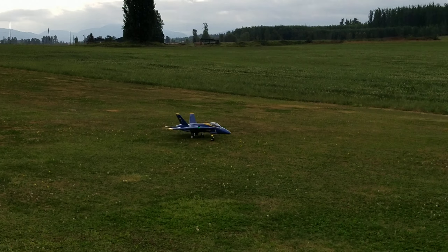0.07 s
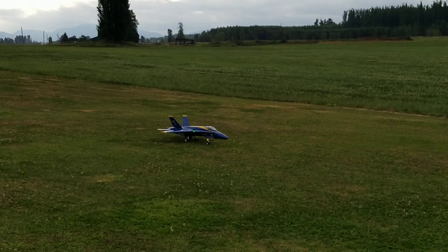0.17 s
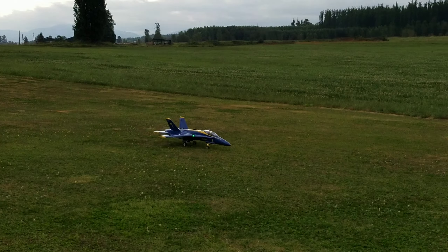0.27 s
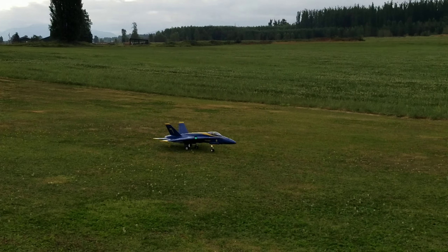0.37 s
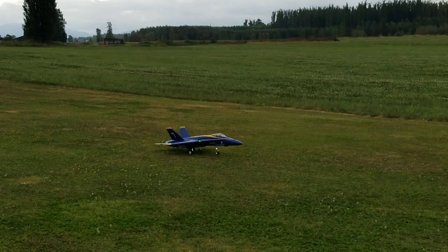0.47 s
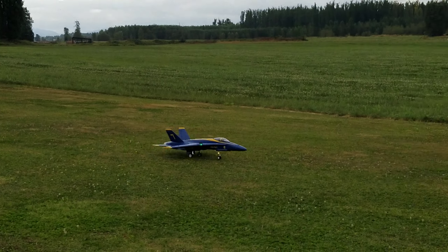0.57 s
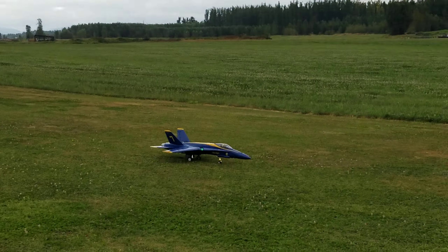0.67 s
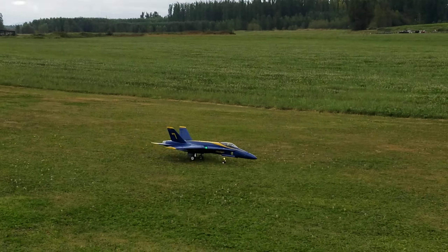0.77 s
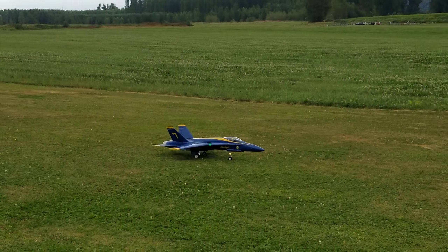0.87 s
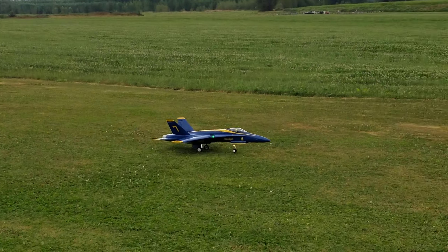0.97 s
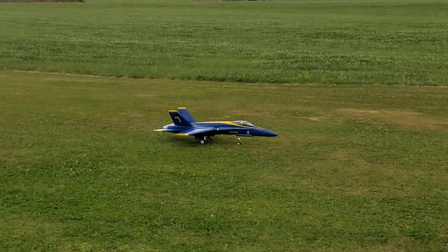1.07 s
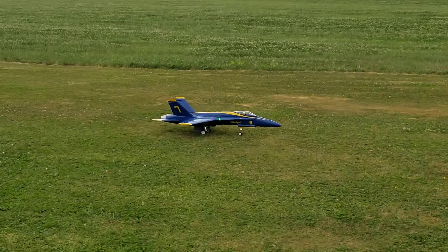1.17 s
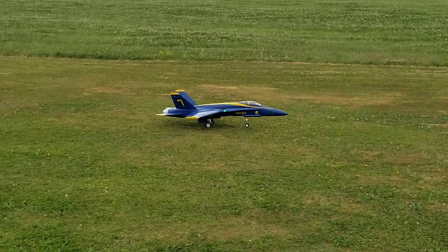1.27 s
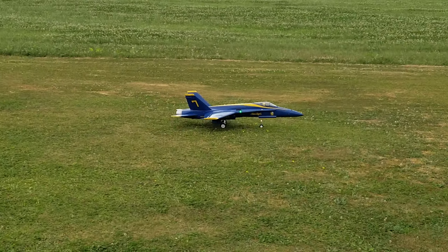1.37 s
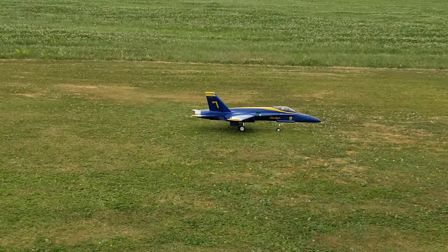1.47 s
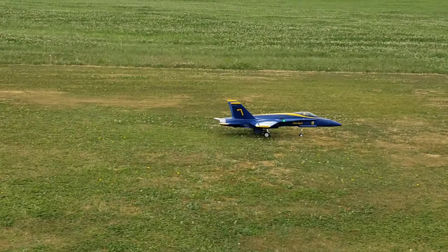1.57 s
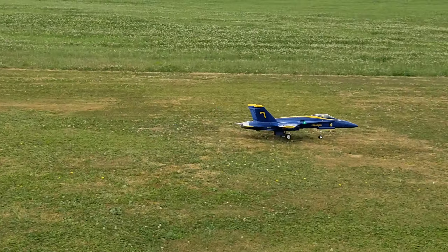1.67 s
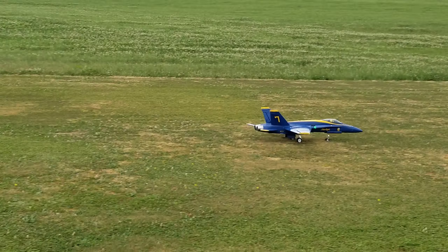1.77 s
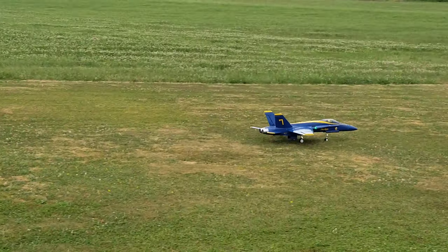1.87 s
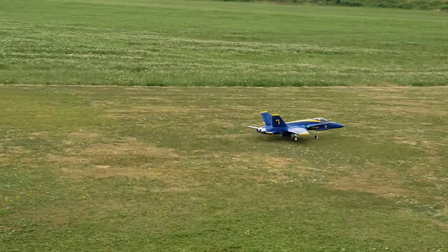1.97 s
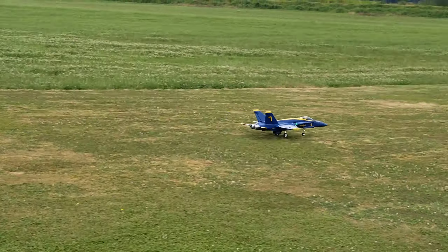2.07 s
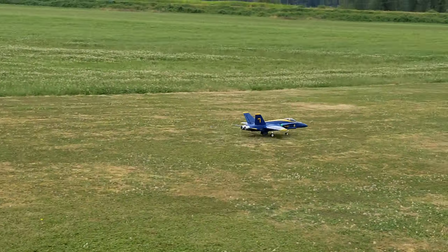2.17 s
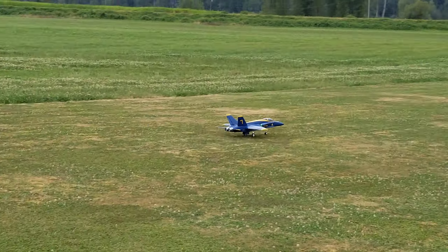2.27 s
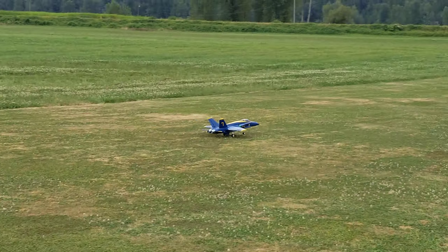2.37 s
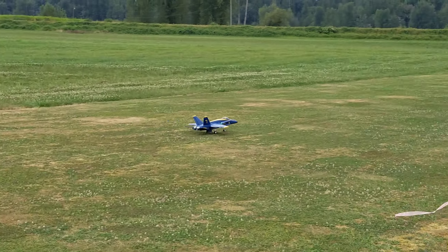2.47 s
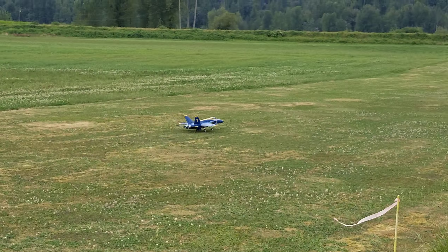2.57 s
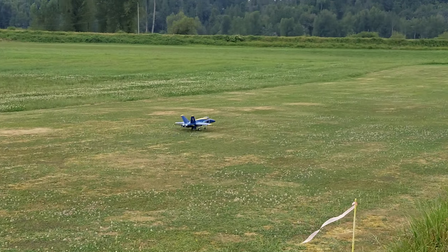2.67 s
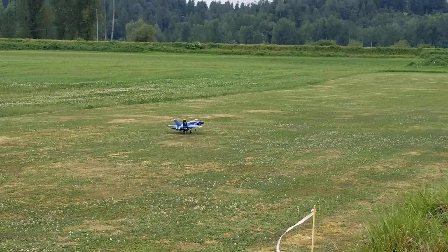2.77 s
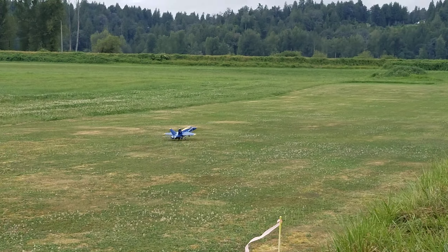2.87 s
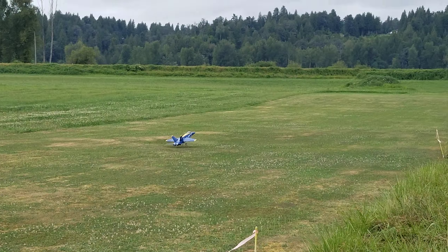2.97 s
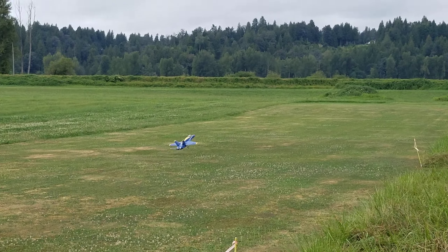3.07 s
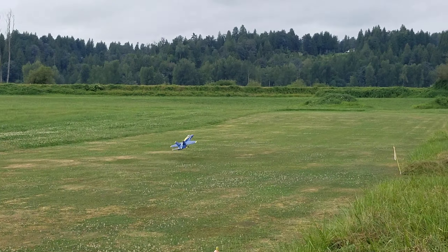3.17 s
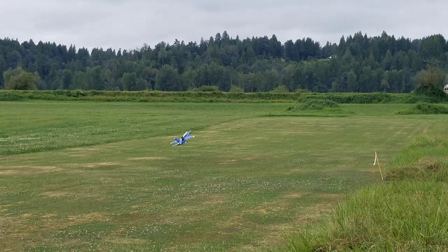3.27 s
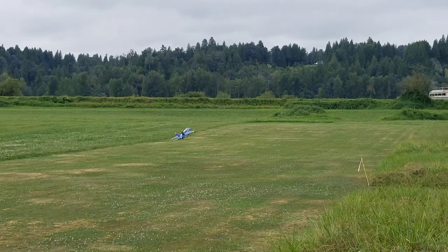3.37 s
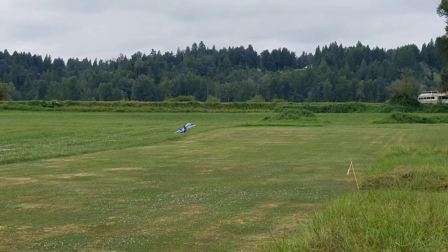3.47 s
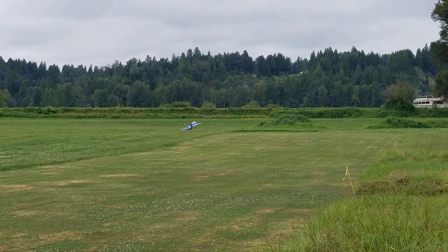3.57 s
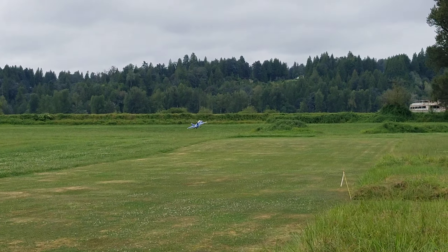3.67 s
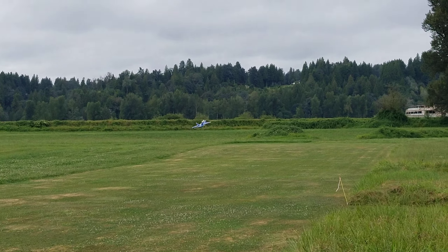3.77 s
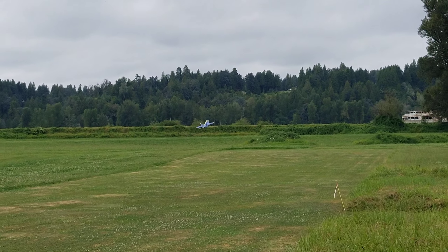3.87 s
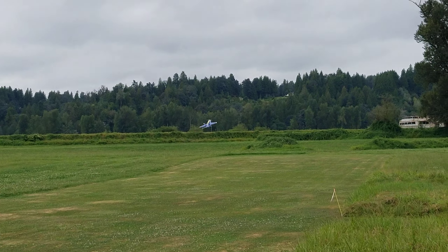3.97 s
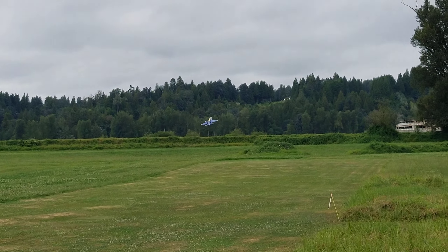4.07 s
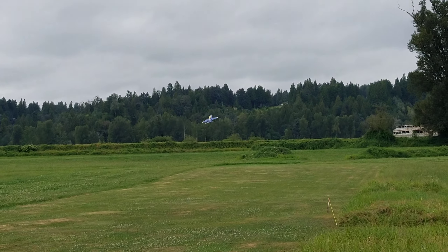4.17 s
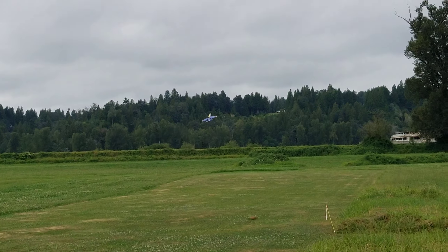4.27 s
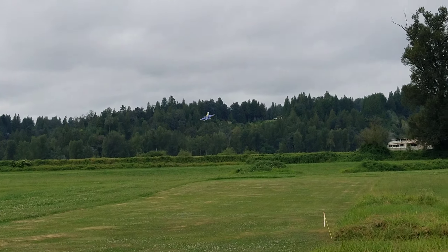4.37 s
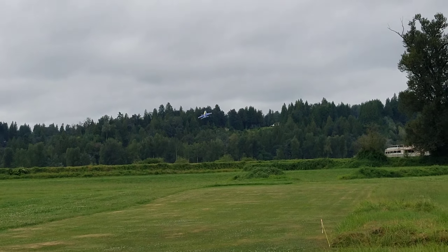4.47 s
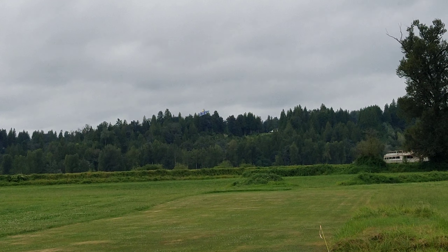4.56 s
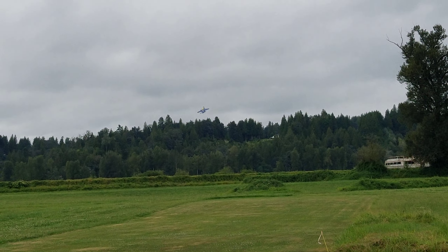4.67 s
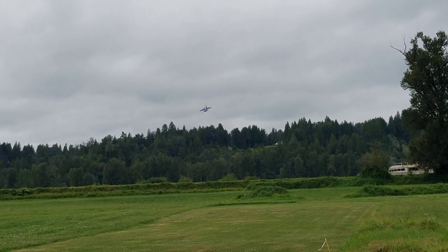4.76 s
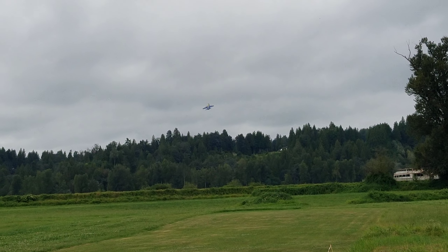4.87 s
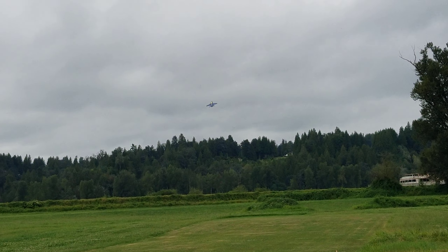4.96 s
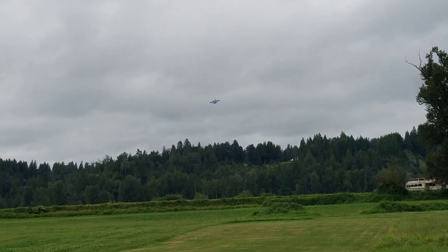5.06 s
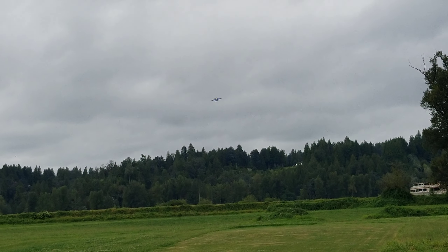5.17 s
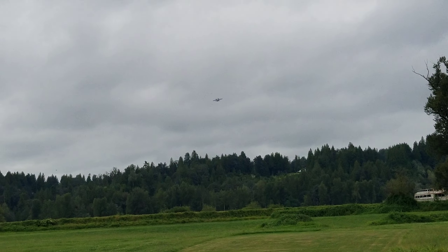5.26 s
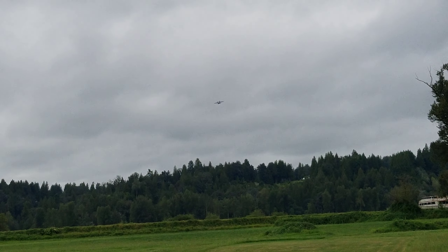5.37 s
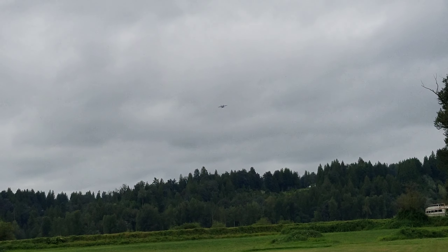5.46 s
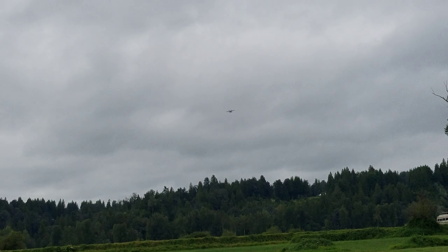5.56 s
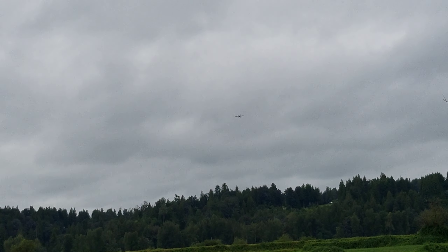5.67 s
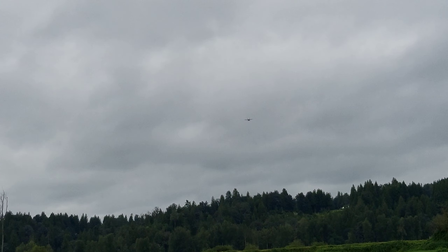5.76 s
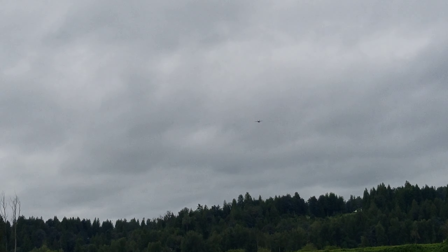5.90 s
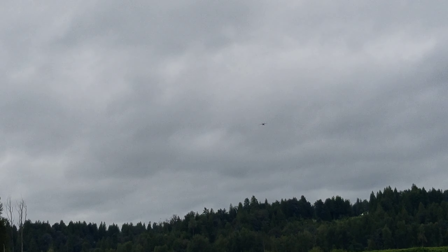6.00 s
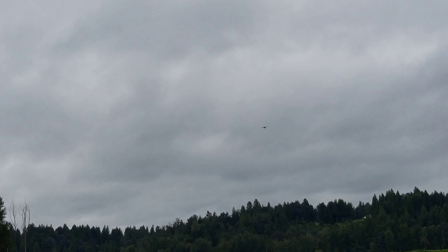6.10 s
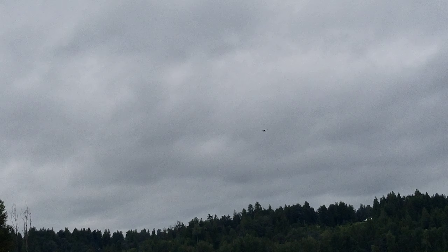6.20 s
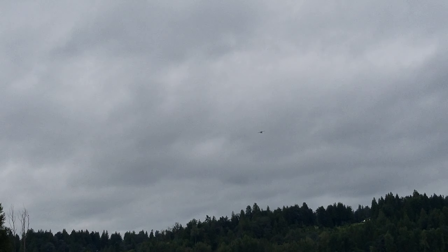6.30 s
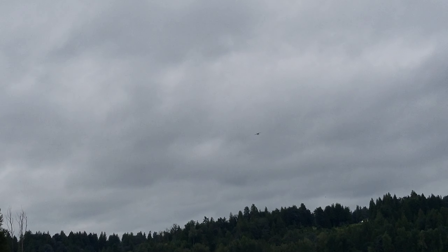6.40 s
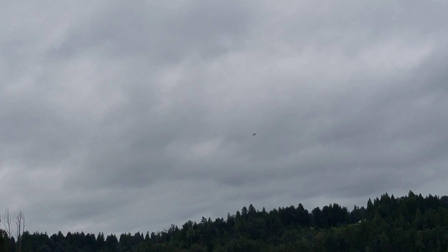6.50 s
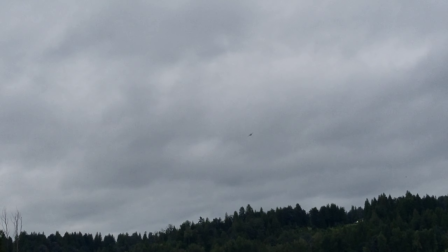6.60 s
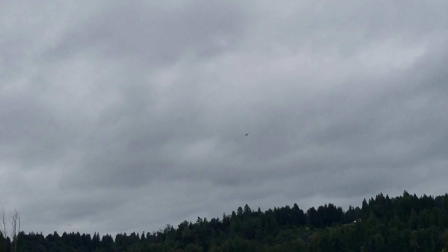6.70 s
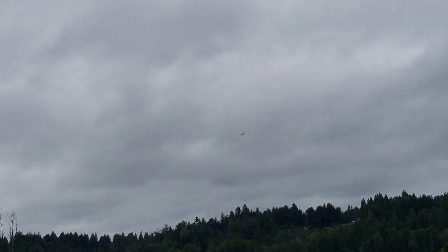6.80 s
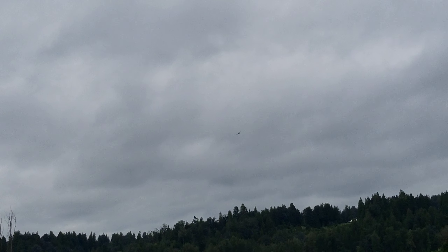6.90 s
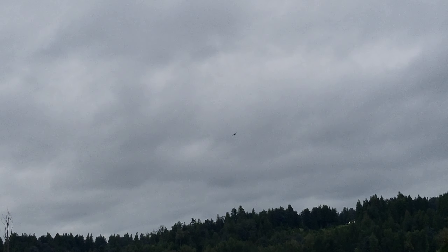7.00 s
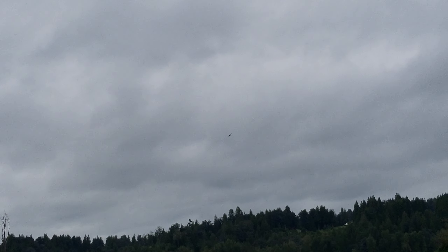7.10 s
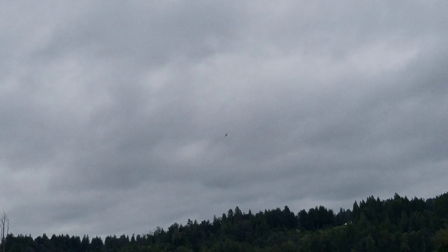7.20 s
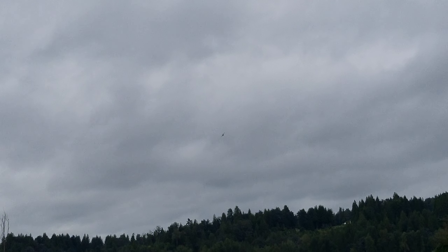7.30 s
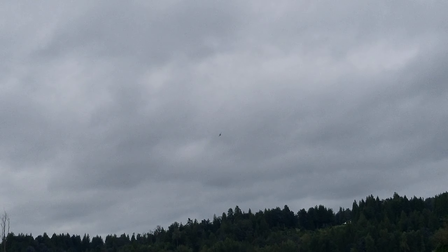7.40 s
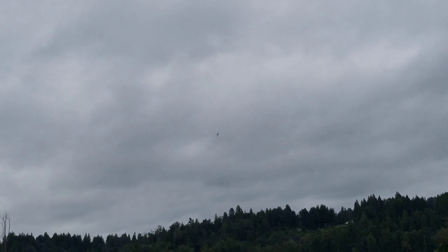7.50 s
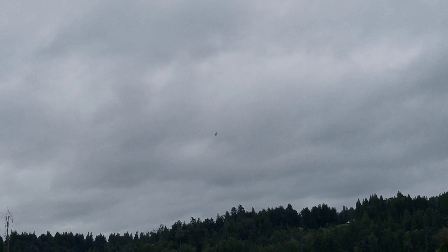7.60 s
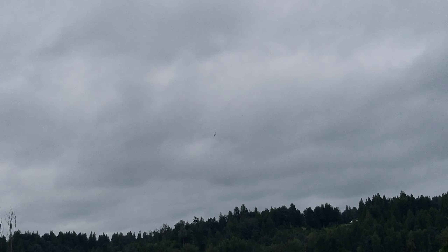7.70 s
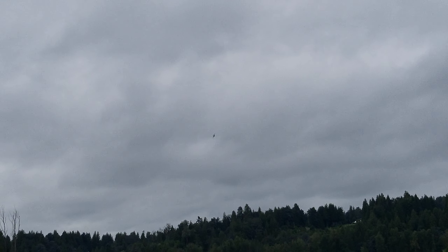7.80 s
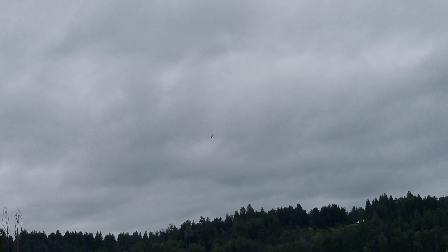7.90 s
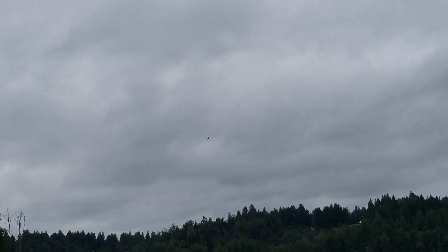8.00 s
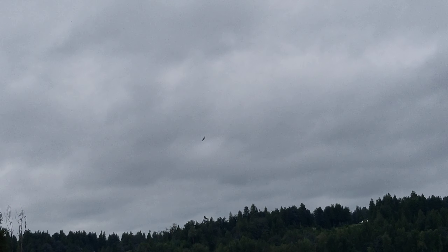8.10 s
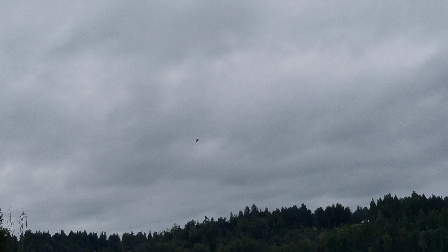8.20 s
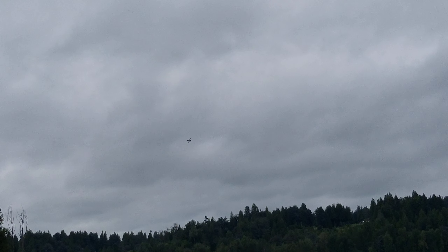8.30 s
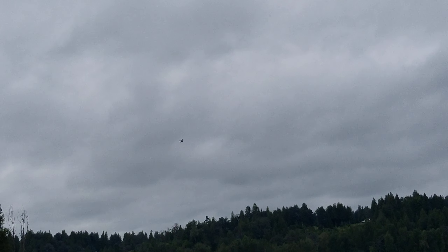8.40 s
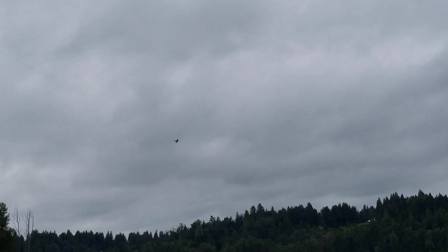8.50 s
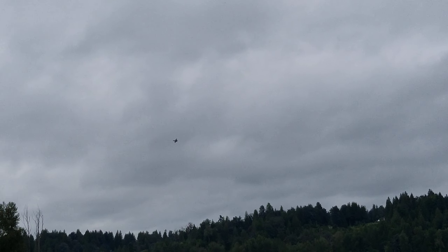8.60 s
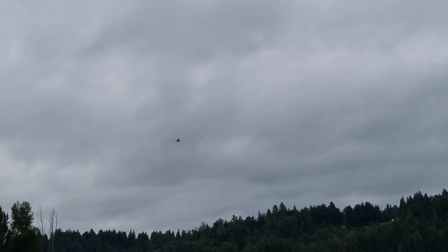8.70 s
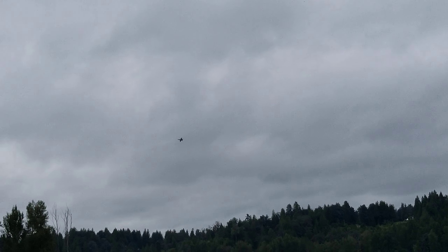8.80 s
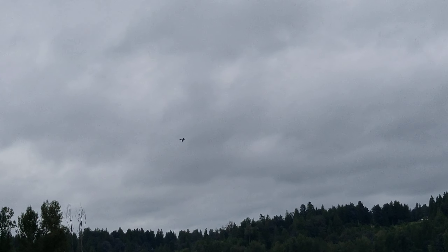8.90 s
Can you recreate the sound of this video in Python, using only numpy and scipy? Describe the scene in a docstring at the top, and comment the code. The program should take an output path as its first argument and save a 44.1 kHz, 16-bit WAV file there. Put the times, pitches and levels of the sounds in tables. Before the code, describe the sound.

From 0 to 0.6 seconds a model jet's electric ducted fan runs steadily, a thin fluttering whine near 3.9 kHz within airy hiss, with low wind thumps on the hand-held stereo microphone. At 0.6-1.05 it spools up quickly to about 5.4 kHz. Around 1-2 seconds it is closest: piercing, wavering whine, loud broad rush and a rough mid-high howl, with heavy wind bumps on the right around 1.1 and 1.7. Pitch then sags slowly as it draws away; a bright hiss sweeps downward around 2.3. The rush dips near 3, returns at lift-off, and takes on a hollow, sliding comb-like colour through 5 while the whine sinks away. From 6 the jet is a dull distant whoosh under uneven wind buffeting. A brief fine lens-motor whirr sounds at 6.2-6.6. Near 8.6-8.9 the faint fan tone steps down and the rush weakens.

```python
"""An electric ducted-fan model jet spools up, runs along a grass field, lifts off and climbs away.
Nine blades whine as sines on the blade rate; shaped noise is the rush of the duct, two noise bands its howls.
The grass echoes the rush, with a lag that grows as the jet climbs.
Wind noise buffets each microphone port of a hand-held camera, whose lens motor whirrs once.
A faint hum stands far off."""
import sys
import numpy as np
from scipy import signal
from scipy.fft import rfft, irfft, next_fast_len
from scipy.io import wavfile
from scipy.ndimage import map_coordinates

SR = 44100
rng = np.random.default_rng(int(sys.argv[2]) if len(sys.argv) > 2 else 0)


def output_pcm(signal):
    """Save a mono or channel-first signal as 16-bit PCM at the path in sys.argv[1].

    Samples are clipped to [-1, 1] before scaling.
    """
    pcm = np.clip(np.atleast_2d(signal).T, -1, 1) * 32767
    wavfile.write(sys.argv[1], SR, np.round(pcm).astype(np.int16))


N = 394650
TIME_S = np.arange(N) / SR

# Blade rate as heard: idle, spool-up, slow fall as the jet draws away, two throttle steps.
# Each row: time in seconds, rate in Hz.
BLADE_RATE_HZ = [(0, 3885), (.6, 3897), (.675, 4025), (.7, 4160), (.775, 4500), (.9, 4985), (.95, 5178),
                 (1.04, 5425), (1.2, 5415), (1.55, 5348), (2.2, 5190), (2.72, 5106), (3.6, 5008),
                 (5.1, 4943), (7, 4853), (8.61, 4815), (8.67, 4722), (8.77, 4716), (8.84, 4555),
                 (8.95, 4545)]
# Blade tone before flutter and port gain. Each row: time in seconds, level in dB.
BLADE_TONE_DB = [(0, -35), (.16, -45.5), (.24, -30.5), (.41, -39), (.52, -31.5), (.68, -42), (.775, -29.5),
                 (.81, -45), (.895, -22), (.925, -35), (.95, -32), (.99, -47), (1.03, -40), (1.065, -20.5),
                 (1.185, -19), (1.225, -35), (1.275, -15), (1.325, -36), (1.355, -19.5), (1.4, -39),
                 (1.43, -20), (1.475, -30), (1.515, -24), (1.55, -36), (1.585, -26), (1.68, -21.5),
                 (1.75, -23.5), (1.9, -21), (2.07, -30), (2.14, -22), (2.5, -22.5), (2.73, -18),
                 (3.03, -35.5), (3.16, -22.5), (3.29, -39.5), (3.57, -30), (3.68, -51), (3.8, -42),
                 (4.47, -51), (5.0, -46.5), (5.5, -40), (6.12, -46.5), (6.4, -53.5), (7.26, -49),
                 (8.14, -56), (8.48, -50), (8.53, -43), (8.6, -41), (8.68, -49), (8.75, -45), (8.82, -55),
                 (8.95, -49)]
# Other multiples of the blade rate, likewise.
# Each row: time in seconds, shaft turn in dB, second multiple in dB, third multiple in dB.
MULTIPLES_DB = [(0, -57, -44, -70), (.62, -60, -47, -70), (.85, -47, -48, -65), (1.05, -37, -35, -52),
                (1.5, -35, -39, -46), (1.95, -50, -44, -36), (2.3, -65, -33, -43), (2.9, -77, -54, -58),
                (5.5, -92, -68, -90), (8.58, -88, -92, -99), (8.65, -86, -73, -99), (8.95, -85, -82, -99)]
# Rush of air through the duct, before shape and colour.
# Each row: time in seconds, level in dB per kHz, treble loss by distance and heading in dB (before its share).
RUSH_DB = [(0, -38.5, 2), (.61, -38.5, 2.5), (1.0, -35.5, -2), (1.6, -35.5, 2.5), (2.3, -39.5, 2.5),
           (3.0, -49, -4), (3.35, -40, 7.5), (3.7, -42, 11.5), (4.35, -44, 3.5), (5.0, -45.5, 10),
           (5.9, -42.5, 28.5), (7.3, -48, 27.5), (7.89, -52, 20.5), (8.15, -48, 30.5), (8.56, -46, 28.5),
           (8.61, -50, 11), (8.78, -54, 8.5), (8.95, -52, 17)]
# Rush heard close by. Each row: pitch in Hz, level in dB, share of the treble loss taken (ratio).
RUSH_SHAPE_DB = [(800, -0.5, 0.15), (1710, -0.5, 0.15), (3250, 1.5, 0.65), (4430, -7, 0.37),
                 (6650, 2, 0.55), (8630, -4, 1), (11030, -10, 0.15), (13200, 2, 1.9), (15500, -14.5, 1.1)]
# Fine colour of the rush. Each row: pitch in Hz, gain in dB.
RUSH_COLOUR_DB = [(200, -5), (310, -9), (400, -10.5), (520, -5), (680, 1.5), (810, -5), (1000, 0.5),
                  (1600, -2), (2150, 2), (2450, -3.5), (3080, 0), (3400, 1), (5000, 7.5), (7000, -4.5),
                  (15700, 3)]
# Left-right correlation of the rush ahead of the port gains. Each row: pitch in Hz, correlation (0-1).
RUSH_LIKENESS = [(1000, 0.89), (3500, 0.93), (15000, 0.56)]
# Howls of the duct: a low pipe howl that rises a little then sinks, and a rougher high howl that climbs.
# Each row: time in seconds, pipe in Hz, pipe level in dB, stall in Hz, stall level in dB.
HOWL_HZ_DB = [(0, 886, -62, 1970, -75), (.68, 875, -65, 1960, -62), (.78, 917, -38, 2160, -49),
              (1.02, 920, -40, 2600, -39.5), (1.55, 924, -42, 2690, -34.5), (2.0, 898, -47, 2814, -45),
              (2.9, 885, -52.5, 3010, -61), (3.25, 870, -49, 3070, -47), (3.6, 882, -61, 3070, -42.5),
              (4.2, 880, -75, 3060, -71)]
# Echo off the grass. Each row: time in seconds, lag in ms, mean strength (0-1).
GRASS_ECHO_MS = [(0, .9, .4), (1, .6, .15), (3.18, .15, .12), (3.3, .23, .5), (3.45, .36, .55),
                 (3.6, .5, .62), (3.9, .67, .6), (4.2, .84, .6), (4.5, 1.08, .55), (4.8, 1.43, .5),
                 (5.1, 1.71, .5), (5.5, 2.05, .4), (8.95, 2.4, .1)]
# Pitch bias of the two ports. Each row: pitch in Hz, left minus right in dB, left lead in rad.
PORT_BIAS = [(300, 3.4, 0), (2400, 2.5, -.1), (4900, 3.8, .05), (6000, 1.5, -.5), (8100, -6.5, .3),
             (10500, -4.5, 1.2), (15000, -1.5, 1.8)]
# The jet moves to the right of the camera. Each row: time in seconds, left port lag in ms.
LEFT_LAG_MS = [(0, -0.015), (2.5, 0.0064), (5.5, 0.043), (8.95, 0.049)]
# Wind spectrum in a mild gust. Each row: pitch in Hz, relative density in dB.
BUFFET_DB = [(22, -49), (45, -3), (70, -1.5), (110, -6), (180, -16), (300, -32.5), (480, -49)]
# Steady wind. Each row: time in seconds, left port in dB, right port in dB.
BREEZE_DB = [(0, -33, -32), (.8, -30.5, -28), (1.9, -41, -28), (2.9, -31, -41), (4.5, -38.5, -48),
             (5.0, -32, -51), (6.1, -30.5, -34), (7.2, -28, -33), (7.9, -34, -37), (8.6, -36.5, -43),
             (8.95, -36, -41)]
# Gusts, left port list then right.
# Each row: middle in seconds, length between 1/e power points in seconds, peak level in dB.
GUSTS_S_DB = [
    [(0.277, 0.087, -18.5), (0.597, 0.33, -22.5), (0.848, 0.16, -22.5), (3.7, 0.16, -28),
     (5.048, 0.074, -28), (5.43, 0.15, -35.5), (5.98, 0.12, -28), (6.27, 0.26, -24), (6.8, 0.13, -22),
     (7.15, 0.26, -28.5), (7.31, 0.097, -21), (7.56, 0.083, -22), (7.87, 0.97, -29), (8.82, 0.24, -29)],
    [(0.087, 0.071, -23), (0.428, 0.094, -27), (1.112, 0.18, -19.5), (1.66, 0.24, -14.5), (4.85, 0.31, -31),
     (6.82, 0.064, -19.5), (7.065, 0.1, -26.5), (7.55, 0.09, -33), (8.75, 0.15, -35.5)],
]

BLADES = 9
GRASS_TURN_RAD = 2.5   # soft ground turns the phase at grazing angles
GRASS_CUT_HZ = 4800   # grass swallows the treble
HOLDER_LAG_MS, HOLDER_SHARE = 2.05, .16   # echo off the person who holds the camera
AIR_START_S, AIR_DB_PER_S = 4.0, 4.0   # air absorption at 13 kHz, growing from the start time
# as the nozzle swings past, a bright band sweeps down
NOZZLE_S, NOZZLE_SPREAD_S, NOZZLE_DB = 2.32, 0.96, 9.5
NOZZLE_HZ, NOZZLE_OCTAVES_PER_S, NOZZLE_OCTAVES = 9100, 1.27, 0.69
LENS_S, LENS_HALF_S, LENS_EDGE_S = 6.375, .175, .06   # middle, half length at full gate, fade beyond it
GEAR_END_HZ, GEAR_TOP_HZ, GEAR_DB = 12800, 20200, -62
LENS_HISS_DB, LENS_WHIRR_DB, LENS_SAG_DB = -50, -54, 9   # levels at the middle, sag at each half length
HUM_HZ, HUM_DB = 565, -63
SELF_NOISE_DB, CUTOFF_HZ = -78, 15760


def in_time(rows):
    """Columns of a time table, interpolated to one value a sample."""
    time_s, *columns = np.transpose(rows)
    return [np.interp(TIME_S, time_s, column) for column in columns]


def at_hz(rows, hz, axis=1):
    """Column of a spectrum table, read on a log pitch axis."""
    table = np.array(rows)
    return np.interp(np.log(hz), np.log(table[:, 0]), table[:, axis])


def from_db(db):
    """Decibels to amplitude gain."""
    return np.exp(np.asarray(db) * (np.log(10) / 20))


def rms_one(x):
    """Scale each channel to rms 1."""
    return x / np.sqrt(np.mean(x ** 2, axis=-1, keepdims=True) + 1e-20)


def drift(corner_hz):
    """Random wander of rms 1: noise through two equal poles, computed every 40 samples."""
    pole = np.exp(-2 * np.pi * corner_hz * 40 / SR)
    white = rng.standard_normal(N // 40 + 2002)
    slow = signal.lfilter([1], [1, -2 * pole, pole * pole], white)[2000:]   # settled part
    return np.interp(np.arange(N) / 40, np.arange(len(slow)), rms_one(slow))


def bands(low_hz, high_hz, count):
    """Yield band centres and pairs of unrelated noises of equal power per Hz."""
    edges_hz = np.geomspace(low_hz, high_hz, count + 1)
    white = rng.standard_normal((2, 2, N))
    for k, (low, high) in enumerate(zip(edges_hz, edges_hz[1:])):
        band_pass = signal.butter(2, [low, high], "band", fs=SR, output="sos")
        yield np.sqrt(low * high), signal.sosfilt(band_pass, white[k % 2])   # neighbours differ


def late(x, lag_ms):
    """Delay each channel by a lag that may move, with cubic interpolation."""
    where = np.broadcast_to(np.arange(N) - lag_ms * SR / 1000, x.shape)
    return np.array([map_coordinates(c, [w], order=3, mode="nearest") for c, w in zip(x, where)])


def port_gains(hz):
    """Complex gains of the left and right port, the bias split evenly between them."""
    half = from_db(at_hz(PORT_BIAS, hz) / 2) * np.exp(.5j * at_hz(PORT_BIAS, hz, axis=2))
    return np.array([half, 1 / half])


def hum():
    """Faint far hum: a carrier with narrow random modulation, so it wavers."""
    waver = drift(9) + 1j * drift(9)
    tone = waver * np.exp(2j * np.pi * HUM_HZ * TIME_S)
    return (from_db(HUM_DB) * tone * port_gains(HUM_HZ)[:, None]).real


def wind():
    """Lumpy low noise of its own in each port; a stronger gust reaches higher in pitch."""
    gust_power = [
        sum(from_db(db) ** 2 * np.exp(-(2 * (TIME_S - mid_s) / length_s) ** 2)
            for mid_s, length_s, db in port)
        for port in GUSTS_S_DB]
    power = from_db(in_time(BREEZE_DB)) ** 2 + gust_power
    port_db = 10 * np.log10(power) + 2.09 * np.array([drift(16.0), drift(13.2)])
    out = 0
    for hz, pair in bands(21.84, 548, count=9):
        reach_db = 0.81 * np.clip(np.log2(hz / 75), 0, 1.9) * (port_db + 21.5)   # none below 75 Hz
        out = out + from_db(port_db + 25.5 + at_hz(BUFFET_DB, hz) + reach_db) * pair
    return out


def lens():
    """Lens motor: a gear tone sweeps up and down amid high hiss, with a duller whirr below."""
    off = np.minimum(np.abs(TIME_S - LENS_S) / LENS_HALF_S, 2)   # distance from the middle in half lengths
    gate = np.clip((1 - off) * LENS_HALF_S / LENS_EDGE_S + 1, 0, 1) ** 2
    gear_hz = GEAR_TOP_HZ + (GEAR_END_HZ - GEAR_TOP_HZ) * off
    white = rng.standard_normal((2, N))
    high_pass = signal.butter(14, 11700, "high", fs=SR, output="sos")
    whirr_band = signal.butter(2, [2500, 6300], "band", fs=SR, output="sos")
    hiss = rms_one(signal.sosfilt(high_pass, white))
    whirr = rms_one(signal.sosfilt(whirr_band, white[0]))   # same in both ports
    gear = np.sqrt(2) * np.sin(2 * np.pi * np.cumsum(gear_hz) / SR)
    gear = gear * from_db(GEAR_DB + 3.5 * drift(60)) * (off < 1)
    noise = from_db(LENS_HISS_DB) * hiss + from_db(LENS_WHIRR_DB) * whirr
    return gate * (gear + from_db(1.1 * drift(74) - LENS_SAG_DB * off) * noise)


def duct():
    """Two narrow noise bands: a pipe resonance, and a rougher, higher howl of stall cells."""
    pipe_hz, pipe_db, stall_hz, stall_db = in_time(HOWL_HZ_DB)
    out = 0
    for hz, db, corner_hz in [(pipe_hz, pipe_db, 30), (stall_hz, stall_db, 90)]:
        carrier = np.exp(2j * np.pi * np.cumsum(hz) / SR)
        howl = (drift(corner_hz) + 1j * drift(corner_hz)) * carrier
        out = out + (from_db(db) * howl * port_gains(hz)).real
    return out


def grass_echo(direct):
    """Add the ground reflection, dulled, phase-turned and late, which combs the spectrum."""
    lag_ms, strength = in_time(GRASS_ECHO_MS)
    analytic = signal.hilbert(direct, next_fast_len(N))[:, :N]
    turned = (analytic * np.exp(-1j * GRASS_TURN_RAD)).real
    turned = signal.sosfilt(signal.butter(1, GRASS_CUT_HZ, fs=SR, output="sos"), turned)
    strength = strength * from_db(1.2 * drift(4.5))   # uneven turf
    return (direct + strength * late(turned, lag_ms)) / np.sqrt(1 + 2.55 * strength ** 2)


def rush():
    """Broad noise of the duct, shaped band by band, combed by the grass and coloured by the ports."""
    level_db, loss_db = in_time(RUSH_DB)
    together = drift(0.83)   # flutter shared by all bands
    air_db = AIR_DB_PER_S * np.maximum(TIME_S - AIR_START_S, 0)
    passing_db = NOZZLE_DB * np.exp(-((TIME_S - NOZZLE_S) / NOZZLE_SPREAD_S) ** 2)
    out = 0
    for hz, (mid, side) in bands(184.0, 16320, count=20):
        db = level_db + at_hz(RUSH_SHAPE_DB, hz) - at_hz(RUSH_SHAPE_DB, hz, axis=2) * loss_db
        db -= (hz / 13000) ** 4 * air_db
        octaves_off = np.log2(hz / NOZZLE_HZ) + NOZZLE_OCTAVES_PER_S * (TIME_S - NOZZLE_S)
        db += passing_db * np.exp(-(octaves_off / NOZZLE_OCTAVES) ** 2)
        db += (hz < 560) * 0.69 * (level_db + 46.0)   # low rumble swells and fades more than the rest
        db += 0.25 * together + 1.36 * drift(11.6)
        likeness = at_hz(RUSH_LIKENESS, hz)
        unlike = np.sqrt(np.clip(1 - likeness, 0, 1) / (1 + likeness))
        gain = np.sqrt(SR / 2000) * from_db(db)   # white noise to dB per kHz
        out = out + gain * (mid + unlike * side * [[1], [-1]])
    out = grass_echo(out)
    size = next_fast_len(N)
    hz = np.maximum(np.fft.rfftfreq(size, 1 / SR), 1)
    response = from_db(at_hz(RUSH_COLOUR_DB, hz)) * port_gains(hz)
    return irfft(rfft(out, size) * response, size)[:, :N]


def whine():
    """Sines on the blade rate; turbulence wavers them, apart in each port, and adds a noise skirt."""
    blade_hz, = in_time(BLADE_RATE_HZ)
    phase = 2 * np.pi * np.cumsum(blade_hz) / SR
    skirt = from_db(-16.0) * (drift(160) + 1j * drift(180))
    multiples = [1, 1 / BLADES, 2, 3]
    levels_db = [*in_time(BLADE_TONE_DB), *in_time(MULTIPLES_DB)]
    out = 0
    for multiple, db in zip(multiples, levels_db):
        amplitude = np.sqrt(2) * from_db(db + 1.77 * drift(10.0))
        tone = amplitude * (1 + max(multiple, 1) * skirt) * np.exp(1j * multiple * phase)
        waver = 0.15 * drift(1.2) + .3j * drift(0.38)   # log gain and phase
        apart = np.exp(waver * np.array([[1], [-1]]) * min(multiple, 1))
        out = out + (tone * apart * port_gains(multiple * blade_hz)).real
    return out


def scene():
    """Rush and howls arrive direct and off the holder, the whine direct; hum, wind and lens are added."""
    background = hum() + wind() + lens()
    air = duct() + rush()
    echo = np.roll(air, round(HOLDER_LAG_MS * SR / 1000), axis=1)
    air = (air + HOLDER_SHARE * echo) / np.sqrt(1 + HOLDER_SHARE ** 2)
    left, right = air + whine()
    left = late(left[None], in_time(LEFT_LAG_MS)[0])[0]
    return np.array([left, right]) + background


def record(dry):
    """The microphone adds its hiss; a steep low-pass cuts the top, gear-tone peak included."""
    hiss = from_db(SELF_NOISE_DB) * rng.standard_normal(dry.shape)
    low_pass = signal.ellip(12, .3, 75, CUTOFF_HZ, fs=SR, output="sos")
    return signal.sosfilt(low_pass, dry + hiss)


dry = scene()
out = record(dry)
output_pcm(out)
```